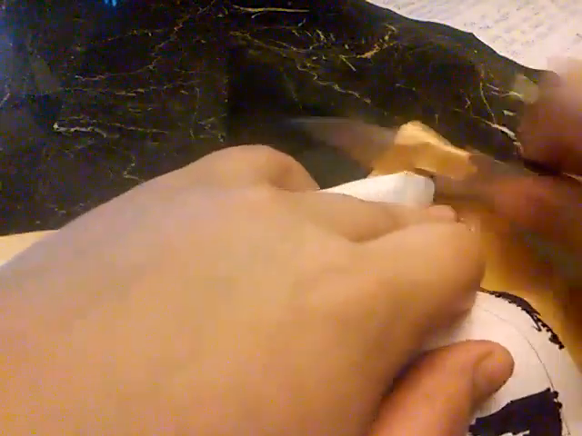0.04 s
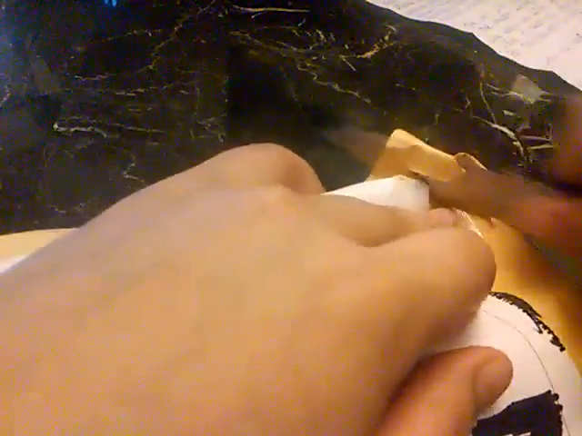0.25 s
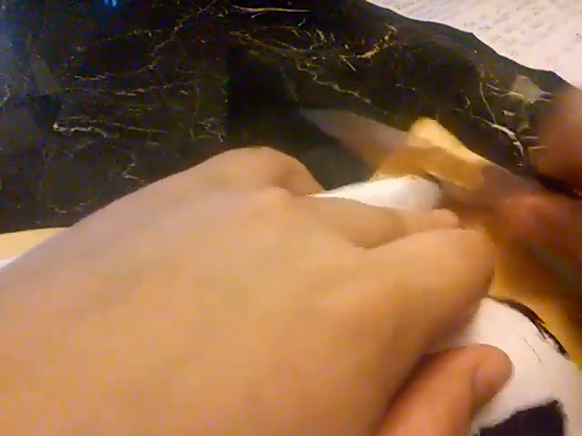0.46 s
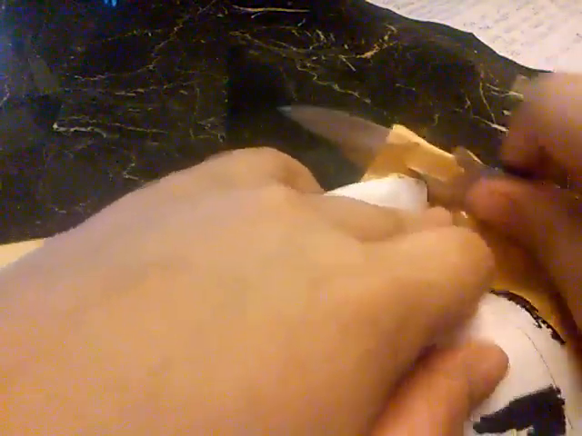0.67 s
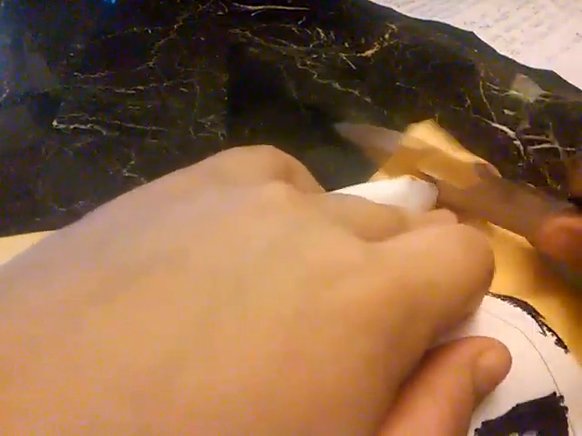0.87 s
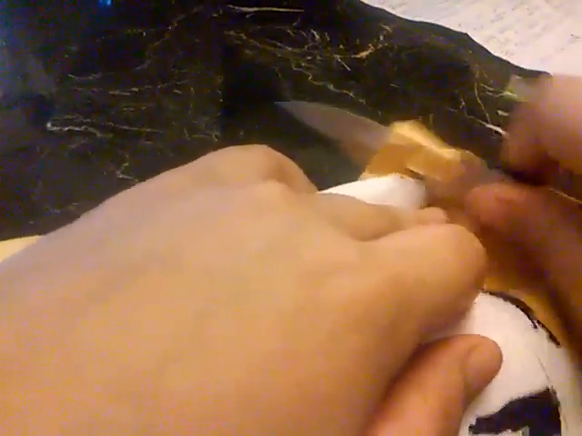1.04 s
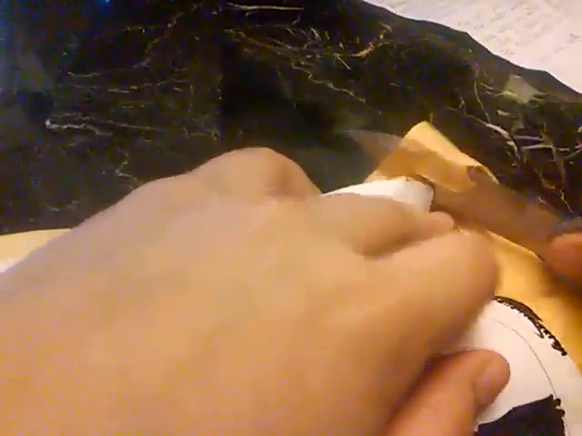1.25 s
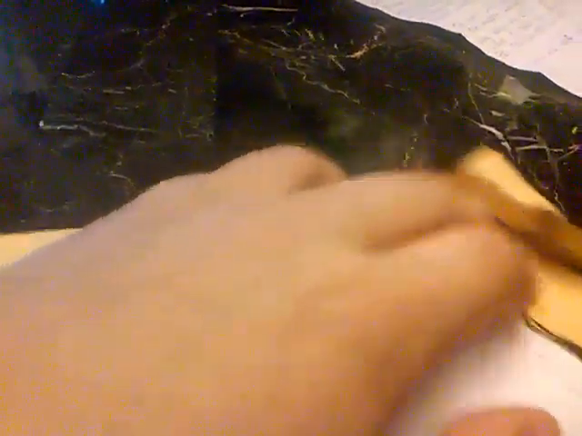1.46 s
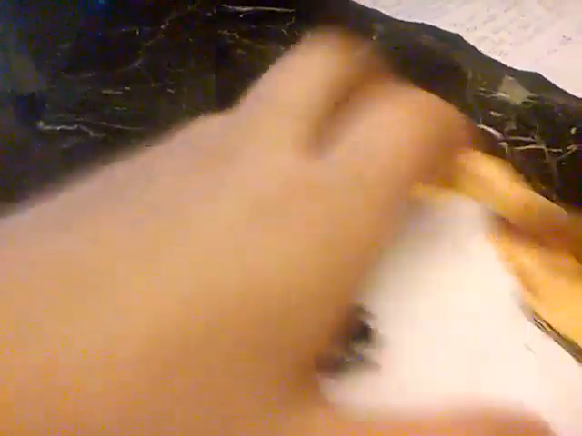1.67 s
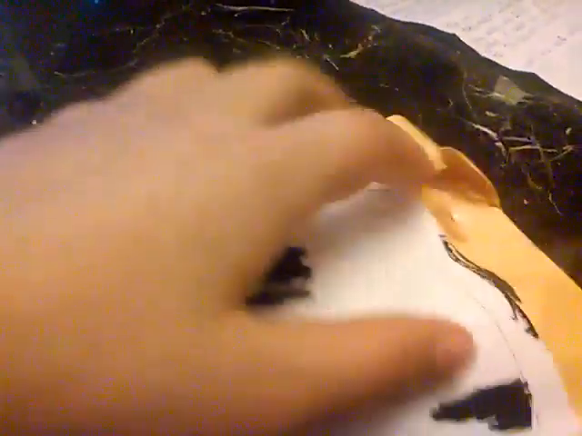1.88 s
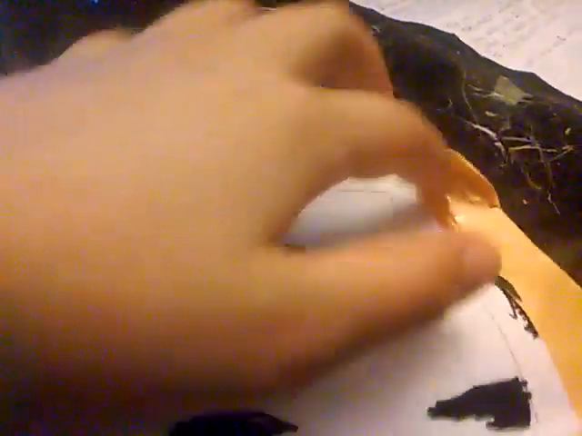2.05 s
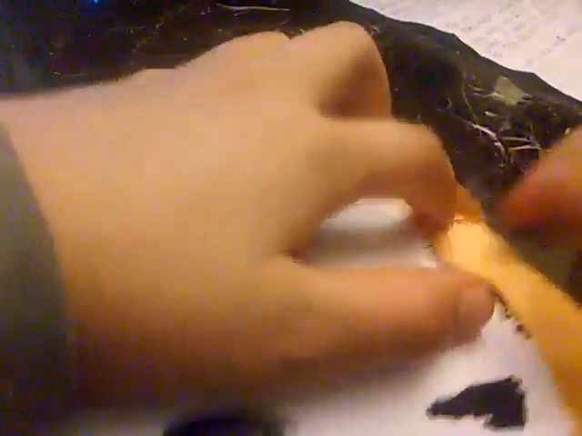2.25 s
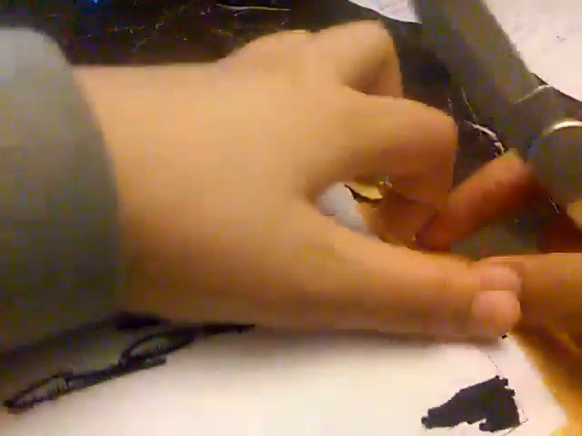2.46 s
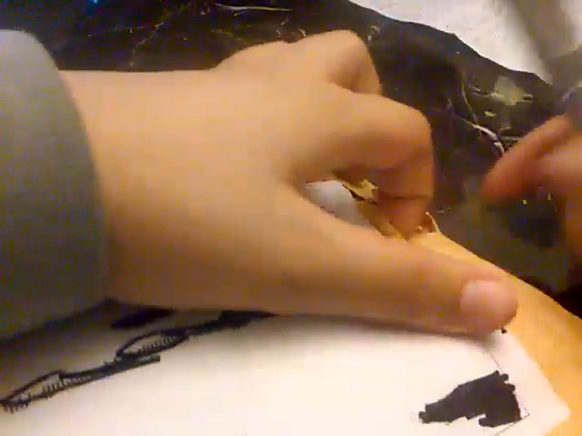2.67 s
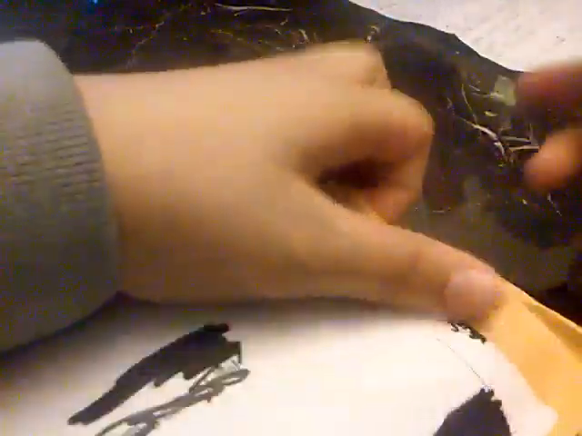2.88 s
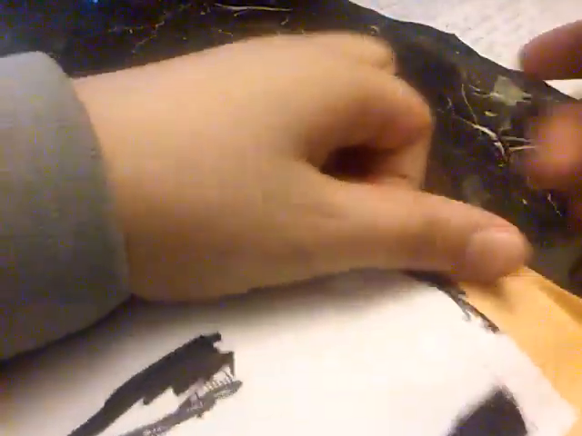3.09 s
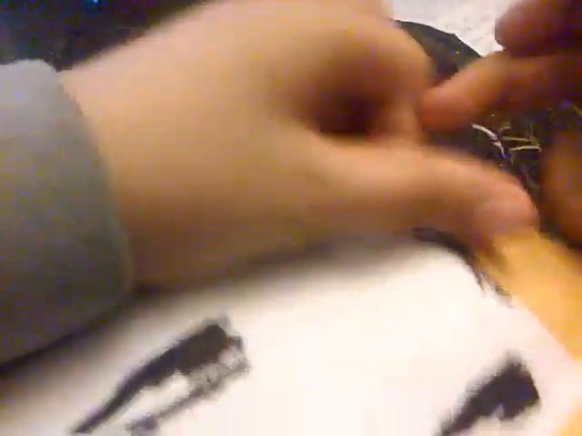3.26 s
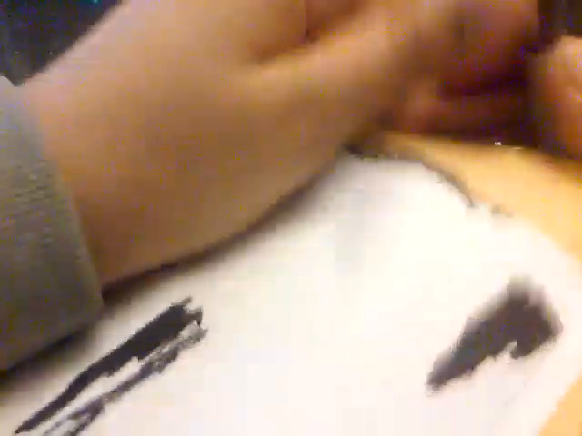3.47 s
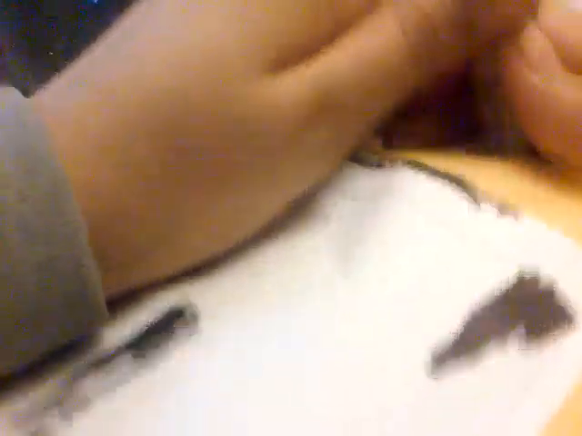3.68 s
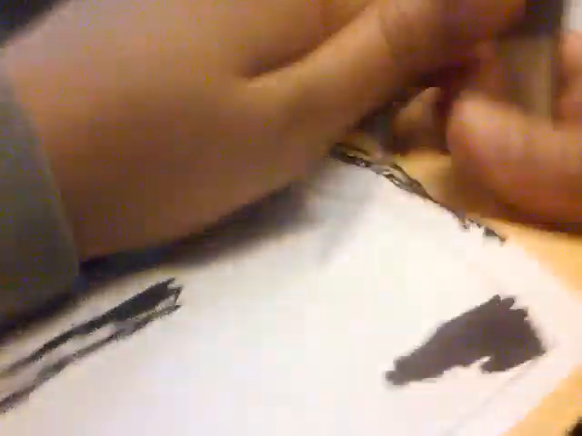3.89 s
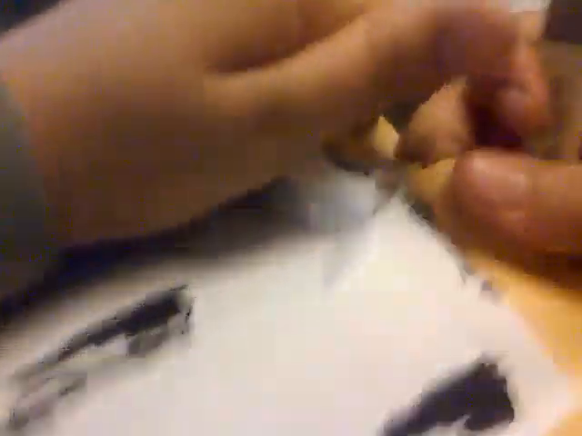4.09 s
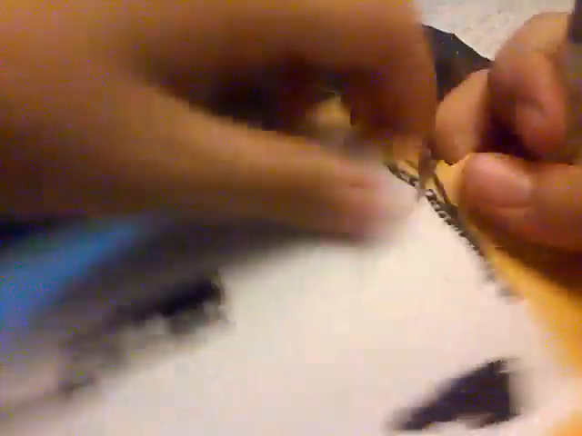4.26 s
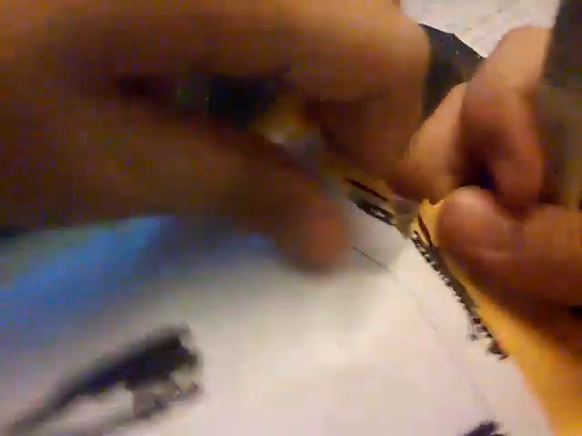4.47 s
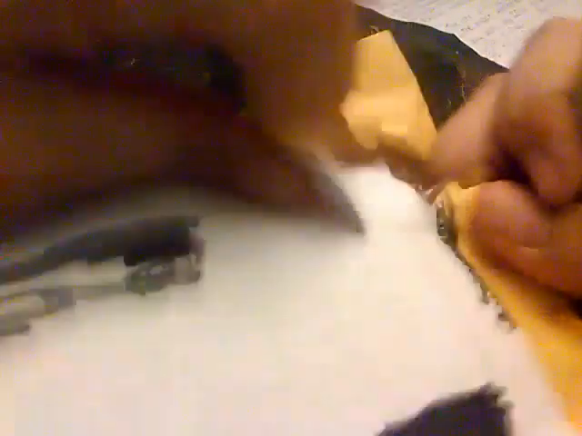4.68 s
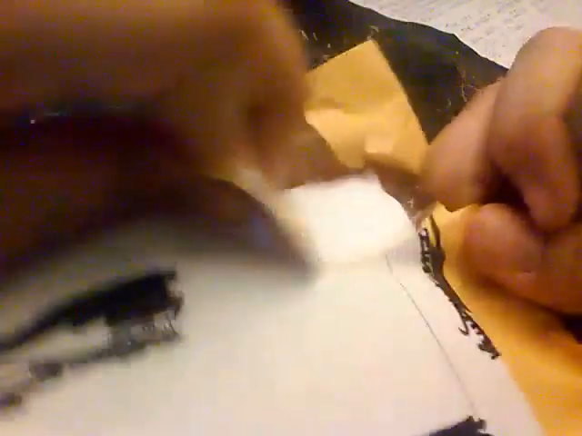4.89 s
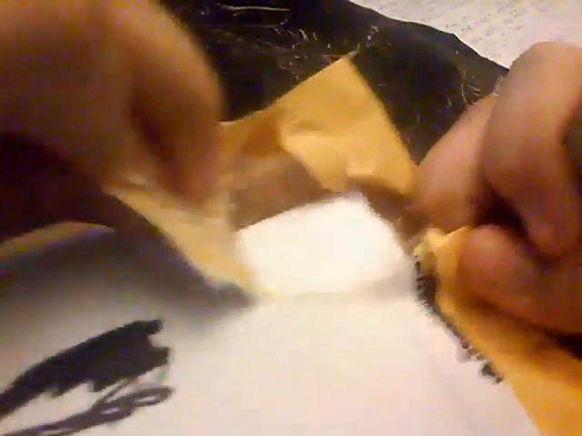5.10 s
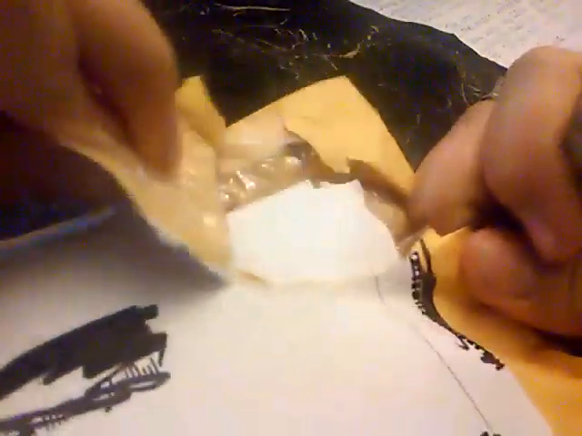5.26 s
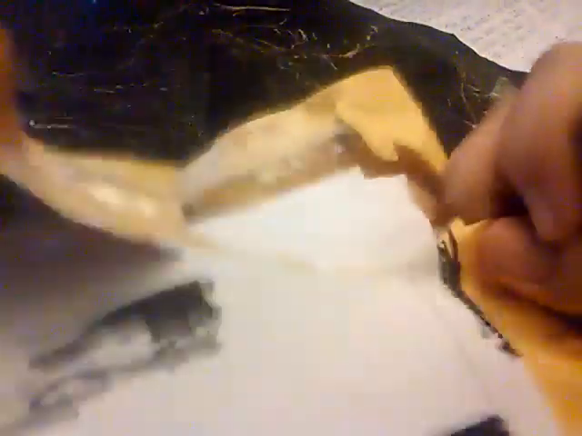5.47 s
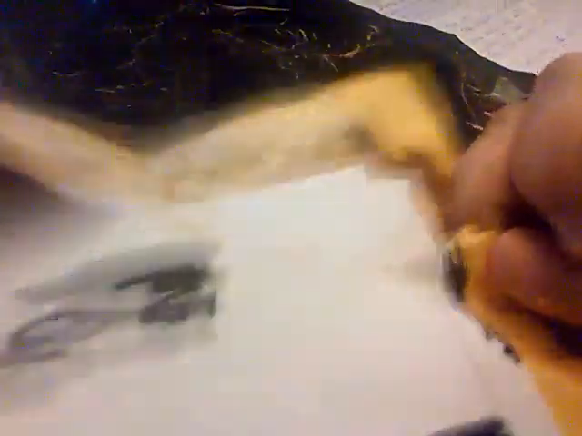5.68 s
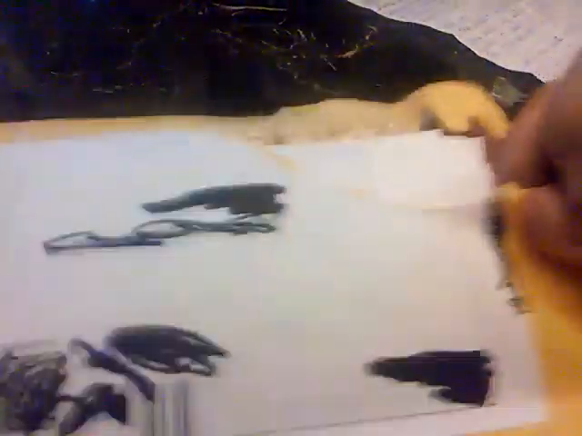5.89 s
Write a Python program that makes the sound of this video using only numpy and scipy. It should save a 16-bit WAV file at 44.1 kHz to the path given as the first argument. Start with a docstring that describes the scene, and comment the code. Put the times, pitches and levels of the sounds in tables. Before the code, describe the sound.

Eight or so short sawing strokes of a blade in paper come first, thin and papery with a slight metallic hiss. Next come hand rubs, isolated snaps and pauses, then a burst of crumpling and hollow bumps. Last, paper and plastic padding tear in stuttering, loud pulls. The recording is close and fairly dry, with short indoor reflections, a faint gated hush and softened peaks.

```python
"""A padded paper mailer is sawn at, rubbed and finally ripped open close by, in a small room.
Noise and random clicks make the rasp of blade, skin and tear; it also drums the sheet and shakes the padding.
Snaps, crinkles, hollow thumps, humming skids and a singing blade are ringing resonances.
Echoes and a faint hush lie behind; the recorder gates quiet sound and rounds off the loudest peaks."""
import sys
import numpy as np
from scipy import signal
from scipy.fft import rfft, irfft
from scipy.io import wavfile
from scipy.ndimage import uniform_filter1d

SR = 44100
rng = np.random.default_rng(int(sys.argv[2]) if len(sys.argv) > 2 else 0)


def dump_mix(stems):
    """Bounce the given channels to the path in sys.argv[1] as a 16-bit WAV at rate SR."""
    frames = np.atleast_2d(stems).T  # one column per channel
    limited = np.clip(frames, -1, 1)  # hard clip at full scale
    pcm = np.round(limited * 32767).astype(np.int16)
    wavfile.write(sys.argv[1], SR, pcm)


N = 261954
TIME = np.arange(N) / SR

# The knife goes to and fro. Each row: start in seconds, length in seconds, rasp of the fibres in dB,
# then drumming of the sheet and rumble of the padding, both in dB against the rasp (all before trims).
KNIFE_STROKES = [(-0.02, 0.11, -42, -1.5, -15), (.102, 0.2, -34, -8, -23), (.3, 0.19, -34.5, -6, -19.5),
                 (.519, .15, -35, -5.5, -26), (.683, 0.14, -36, -4.5, -21.5), (.824, 0.17, -35.5, -8, -26),
                 (.995, .15, -33, -3, -13), (1.14, 0.2, -36.5, -6.5, -15.5)]
STROKE_LEAN = 0.93   # under 1, the speed peaks before the middle of a stroke


def knife():
    """The edge saws through fine fibres and sets the flap ringing; a faster blade sounds brighter."""
    # Spectrum of the sawing. Each row: frequency in Hz, level in dB.
    saw_spectrum = [(35, -34), (60, -5), (193, -16.5), (346, -6.5), (492, -24.5), (991, 1), (1700, -4.5),
                    (2050, -15.5), (2300, -3.5), (2580, -7), (2900, -3.5), (4030, -8.5), (5330, -10),
                    (14200, -13), (16000, -18)]
    # The flap rings under the blade. Each row: frequency in Hz, width in Hz, boost in dB.
    flap_rings = [(1820, 160, 8.5), (2950, 380, 3), (5270, 760, 6), (7800, 310, 2.5)]
    # rasp, sheet and padding grow as these powers of the speed
    effort = slides(KNIFE_STROKES, (1.33, 1, 1), STROKE_LEAN)
    force = fibres(per_s=5900, spread_db=-2.0, friction_db=-3.0, patchy_db=1.0)
    ringing = sum((from_db(db) - 1) * resonance(force, hz, width) for hz, width, db in flap_rings)
    sawing = paper(effort, force + ringing, saw_spectrum, slips_per_s=270, slip_db=2.0,
                   rasp_db=-1.46, sheet_db=-2.7, pad_db=2.0)
    return sawing + crinkles(effort, ring_db=3.5, crack_db=-9.0)


def blade_song(sing_hz=5390, width_hz=870, sing_db=-7, speed_power=4.0):
    """Near the top speed of each stroke, friction excites a narrow band of the blade."""
    effort = slides(KNIFE_STROKES, [speed_power], STROKE_LEAN)[0]
    friction = rng.standard_normal(N)
    tone = resonance(resonance(friction, sing_hz, width_hz), sing_hz, width_hz)
    return from_db(sing_db) * effort * rms_one(tone)


def fingers():
    """Skin drags over paper, with sparse crinkles; it grips at once, so speed matters less."""
    # Finger slides. Each row: start in seconds, length in seconds, rasp in dB,
    # then drumming of the sheet and rumble of the padding, both in dB against the rasp (all before trims).
    finger_slides = [(1.35, 0.24, -48.5, 1, -1), (1.398, 0.34, -39, -4, -16), (1.597, 0.091, -32.5, 1, -15),
                     (1.705, 0.1, -31, -9.5, -17), (1.778, 0.091, -39.5, -2.5, -7),
                     (1.903, 0.092, -53, 3.5, -1), (2.087, 0.026, -48, -4.5, -2.5),
                     (2.2, 0.1, -48, -8, -0.5), (2.392, 0.19, -40.5, -13.5, -14),
                     (2.671, 0.042, -44.5, -4.5, -9), (2.793, 0.047, -48.5, 0, -5.5),
                     (2.812, 0.079, -43, -6.5, -17.5), (2.91, 0.2, -37.5, -6, -15),
                     (3.135, 0.073, -40, -3.5, -13.5), (3.243, 0.086, -46.5, -0.5, -15),
                     (3.338, 0.071, -49.5, -6, -16), (3.386, 0.14, -39.5, -3, -12.5),
                     (3.5, 0.13, -35.5, -6.5, -17.5), (3.673, 0.19, -42, -3, -15),
                     (3.75, 0.12, -31, -8.5, -14), (3.87, 0.072, -36, -8.5, -12),
                     (3.938, 0.13, -25, -3.5, -18.5), (4.04, 0.073, -48.5, -4, -2),
                     (4.145, 0.16, -50, -3, -17), (4.23, 0.18, -38, -4, -8), (4.375, 0.21, -39, -6.5, -17),
                     (4.524, 0.12, -45, -8, -16.5)]
    # Spectrum of the rubbing. Each row: frequency in Hz, level in dB.
    rub_spectrum = [(35, -24), (60, -11.5), (130, -8.5), (168, -14), (233, -10), (398, -13.5), (437, -29),
                    (903, 3.5), (1200, 8), (1550, -2.5), (5210, -6), (10500, -10.5), (16000, -17.5)]
    # Flat skin rubs dully, nails and film edges brightly. Each row: time in seconds, top treble in dB.
    treble_path = [(1.4, -2.5), (1.8, -4.5), (2.45, 3), (2.7, -3.5), (3.0, -5.5), (3.3, -5), (3.6, -1),
                   (3.95, -0.5), (4.2, -5), (4.5, 6)]
    effort = slides(finger_slides, (0.45, 0.35, 0.54), lean=0.67)
    force = fibres(per_s=2500, spread_db=0.5, friction_db=4.5, patchy_db=-0.5)
    dull = band(force, 7000, "low", order=1)
    treble_gain = from_db(np.interp(TIME, *np.transpose(treble_path)))
    force = dull + treble_gain * (force - dull)
    rubbing = paper(effort, force, rub_spectrum, slips_per_s=380, slip_db=4.0,
                    rasp_db=-1.84, sheet_db=-3.3, pad_db=0.0)
    return rubbing + crinkles(effort, ring_db=0.5, crack_db=-1.5)


def rip():
    """The tear runs in jerks through fibre bundles and plastic film."""
    # Spectrum of the tearing. Each row: frequency in Hz, level in dB.
    rip_spectrum = [(29, -45), (50, -18), (96, -6.5), (184, -7.5), (246, -5), (678, -12), (1330, -0.5),
                    (1500, -3), (1820, -9), (2440, -6.5), (4790, -3.5), (10400, -8.5), (16000, -15.5)]
    effort = pulls()
    force = fibres(per_s=3200, spread_db=3.0, friction_db=-2.5, patchy_db=2.0)
    tearing = paper(effort, force, rip_spectrum, slips_per_s=200, slip_db=2.5,
                    rasp_db=1.2, sheet_db=-1.0, pad_db=-3.5)
    return tearing + crinkles(effort, ring_db=-2.0, crack_db=5.5)


def pulls(build_db=25, fall_db_per_s=474):
    """In each jerk the tension builds, holds while the tear runs, and dies away."""
    # The tear jerks on. Each row: start in seconds, rise in seconds, hold in seconds, rasp in dB,
    # then drumming of the sheet and rumble of the padding, both in dB against the rasp (all before trims).
    tear_jerks = [(4.703, 0.018, 0.067, -29.5, -4.5, -4.5), (4.901, 0.011, 0.024, -42.5, 0, -2.5),
                  (4.929, 0.043, 0.13, -27.5, -7.5, -14.5), (5.117, 0.064, 0.063, -35.5, -9.5, -10),
                  (5.246, 0.028, 0.034, -26.5, -8, -10.5), (5.318, 0.029, 0.063, -30, -4.5, -13),
                  (5.402, 0.031, 0.02, -17, -9, -10.5), (5.443, 0.029, 0.019, -14.5, -2.5, -3),
                  (5.517, 0.012, 0.083, -44, 3, -4.5), (5.603, 0.044, 0.049, -38.5, -2, -7.5),
                  (5.725, 0.059, 0.059, -17, -0.5, -4), (5.804, 0.026, 0.037, -15.5, -1, -6)]
    t = TIME[:SR // 2]

    def tension(rise, hold):
        """Gain that climbs, stays at 1, then falls steadily in dB."""
        climb = build_db * np.minimum(t / rise - 1, 0)
        fall = fall_db_per_s * np.maximum(t - rise - hold, 0)
        return from_db(climb - fall)
    return effort_of((start, tension(rise, hold), *levels) for start, rise, hold, *levels in tear_jerks)


def slides(rows, powers, lean):
    """Each slide speeds up and slows down in a leaning half sine; its loudness follows the speed."""
    def loudness(start, length):
        """A power of the speed for each layer."""
        share = (np.arange(max(start, 0), start + length, 1 / SR) - start) / length
        speed = np.sin(np.pi * share ** lean).clip(0)
        return speed ** np.array(powers)[:, None]
    return effort_of((start, loudness(start, length), *levels) for start, length, *levels in rows)


def effort_of(moves):
    """Turn moves into gains of rasp, sheet and padding; overlapping moves add in power."""
    power = np.zeros((3, N))
    for start, envelope, rasp_db, sheet_db, pad_db in moves:
        gains = from_db([[rasp_db], [rasp_db + sheet_db], [rasp_db + pad_db]]) * envelope
        for layer, gain in zip(power, gains):
            add(layer, start, gain ** 2)
    return np.sqrt(power)


def fibres(per_s, spread_db, friction_db, patchy_db):
    """Fibres let go at random with uneven force, each ringing a small facet, over smooth sliding friction."""
    sizes = from_db(spread_db * np.minimum(rng.exponential(1, N), 4.5)) * rng.choice([-1, 1], N)
    clicks = sizes * (rng.random(N) < per_s / SR)
    pitches = np.geomspace(700, 15000, 16)   # Hz
    dealt = rng.integers(0, len(pitches), N)
    breaks = np.zeros(N)
    for k, hz in enumerate(pitches):
        # the facets in play change as the contact travels
        patches = from_db(patchy_db * drift(25))
        breaks += resonance(clicks * (dealt == k), hz, hz / 2) * patches
    return rms_one(rms_one(breaks) + from_db(friction_db) * rng.standard_normal(N))


def paper(effort, force, colour, slips_per_s, slip_db, rasp_db, sheet_db, pad_db):
    """A sticking and slipping force rasps at the contact, drums the sheet and shakes the padding."""
    grip = from_db(slip_db * np.clip(drift(slips_per_s), -2, 2))
    sound = coloured(force * grip, colour)
    rasp = from_db(rasp_db) * evened(band(sound, 2890, "high", order=3))
    drum = from_db(sheet_db) * evened(band(sound, [620, 2400], "band", order=4))
    rumble = from_db(pad_db) * evened(band(sound, 550, "low", order=4))
    return np.sum(effort * [rasp, drum, rumble], axis=0)


def crinkles(effort, ring_db, crack_db, per_s=24, middle_hz=2200, pitch_octaves=0.55, spread_db=3.5):
    """Lesser creases give way at random, as small snaps whose levels follow the rasp of the moment."""
    out, rasp = np.zeros(N), effort[0]
    for s in rng.uniform(0, N / SR, int(per_s * N / SR)):
        ring, pitch, crack = np.clip(rng.standard_normal(3), -2, 2)
        hz = middle_hz * 2 ** (pitch_octaves * pitch)
        add(out, s, snap(ring_db + spread_db * ring, hz, crack_db + spread_db * crack))
    return rasp * out


def snaps():
    """The big creases and bonds give way."""
    # Paper buckles or a bond breaks. Each row: time in seconds, ring in dB, ring pitch in Hz,
    # crack in dB (both levels before trims).
    big_snaps = [(0.1181, -26, 2090, -24), (0.803, -35, 1380, -54), (1.0294, -21, 2730, -17),
                 (1.2058, -26.5, 1200, -27.5), (1.4929, -41, 2190, -30), (1.584, -15, 920, -23),
                 (1.601, -28, 1130, -52), (1.6161, -18.5, 1480, -37), (1.6732, -33.5, 1860, -46),
                 (2.143, -53, 3800, -53.5), (2.2122, -24.5, 2220, -53.5), (2.2759, -39.5, 2900, -38),
                 (2.554, -28.5, 1080, -61), (2.7933, -44.5, 2570, -64.5), (2.9045, -38, 2540, -33),
                 (2.982, -9, 2020, -11.5), (3.082, -25.5, 1960, -49), (3.1128, -33.5, 1000, -70),
                 (3.2486, -36.5, 1310, -65), (3.4747, -27.5, 1320, -29.5), (3.4997, -31, 1000, -47),
                 (3.5761, -33.5, 2290, -28.5), (3.6756, -35.5, 990, -44), (3.7496, -21.5, 1290, -19.5),
                 (3.7927, -18.5, 2430, -12), (3.8327, -23, 750, -21.5), (3.861, -25, 1270, -27.5),
                 (3.9401, -11, 1090, -17.5), (3.9451, -14.5, 2210, -2.5), (3.9711, -15.5, 3200, -35),
                 (4.0036, -26, 2080, -17.5), (4.0254, -18, 1630, -15.5), (4.1403, -20, 2670, -63),
                 (4.2303, -26.5, 1420, -32), (4.245, -30, 3350, -37), (4.282, -24.5, 2090, -29.5),
                 (4.3112, -21, 1290, -26.5), (4.365, -30.5, 1800, -30), (4.5318, -29.5, 2470, -23.5),
                 (4.5482, -25.5, 2460, -32), (4.6923, -39.5, 3400, -48), (4.7148, -18, 3060, -20),
                 (4.7202, -27.5, 2800, -24), (4.7477, -19.5, 2850, -22), (4.7523, -12.5, 2950, -17),
                 (4.9743, -22, 2170, -32), (5.2694, -30, 3000, -22), (5.2966, -18, 1590, -17),
                 (5.3493, -12, 2860, -15), (5.3832, -20, 3100, -17), (5.4319, -13, 2460, -18),
                 (5.4454, -0.5, 3300, -20), (5.4508, -11, 2670, -8), (5.4657, -5.5, 3200, -5),
                 (5.4956, -7.5, 3200, -6), (5.7306, -27, 2320, -25.5), (5.7668, -13.5, 1830, -10.5),
                 (5.7885, -22, 2800, -10), (5.7936, -1.5, 2710, 1.5), (5.8241, -8.5, 2600, -16),
                 (5.864, -17, 2220, -6)]
    out = np.zeros(N)
    for s, level, hz, crack_level in big_snaps:
        add(out, s, snap(level, hz, crack_level))
    return out


def snap(level, hz, crack_level, ring_t60=0.011, crack_t60=0.005, width_share=1.0, splinter=0.21,
         overtone=1.46, crack_middle_hz=6900, crack_attack_s=0.00017, crack_share=0.57,
         crack_spread=0.044, ring_db=-1.5, crack_db=-4.0):
    """A facet flips over: a burst of cracking, and two damped modes whose pitch follows the facet's size."""
    # Spectrum of a crack. Each row: frequency in Hz, level in dB.
    crack_spectrum = [(2000, -18), (3500, 0), (5400, 1.5), (8500, -5), (11000, -2.5), (16000, -9)]
    t = TIME[:1024]
    push, split = rng.standard_normal((2, len(t)))
    # one sharp release, then the crease splinters on
    push = (t == 0) + splinter * push * from_db(-60 * t / ring_t60)
    low, high = hz / np.sqrt(overtone), hz * np.sqrt(overtone)
    ring = resonance(push, low, width_share * low) - resonance(push, high, width_share * low)
    ring = band(ring, [650, 4800], "band", order=3)
    split = split * (1 - np.exp(-t / crack_attack_s)) * from_db(-60 * t / crack_t60)
    crack_hz = crack_middle_hz * np.exp(crack_spread * rng.standard_normal())
    crack = resonance(coloured(split, crack_spectrum), crack_hz, crack_share * crack_hz)
    both = from_db(level + ring_db) * rms_one(ring) + from_db(crack_level + crack_db) * rms_one(crack)
    # a level counts as if all the energy fell within four milliseconds
    return both * np.sqrt(0.004 * SR / len(t))


def skids(gain_db=-4.0, grain_db=2.5):
    """Friction held on one resonance starts quickly and eases off."""
    # An edge skids and keeps one patch of paper humming. Each row: start in seconds, length in seconds,
    # pitch in Hz, width in Hz, level in dB (before the gain).
    edge_skids = [(1.062, 0.041, 1300, 610, -28.5), (1.23, 0.16, 2950, 500, -47),
                  (1.26, 0.57, 1570, 250, -47.5), (1.397, 0.047, 7700, 1000, -49),
                  (1.609, 0.028, 3760, 2500, -23.5), (1.953, 0.025, 1400, 700, -42),
                  (2.548, 0.015, 1640, 1200, -38.5), (3.387, 0.041, 9100, 3050, -35),
                  (4.541, 0.032, 1600, 704, -32.5)]
    out = np.zeros(N)
    friction = rng.standard_normal(N) * from_db(grain_db * drift(400))
    for s, length, hz, width, level in edge_skids:
        corners = [s, s + 0.003, s + 0.7 * length, s + 1.2 * length]
        pressure = np.interp(TIME, corners, [0, 1, 1, 0])
        tone = rms_one(resonance(resonance(friction, hz, width), hz, width))
        out += from_db(level + gain_db) * pressure * tone
    return out


def thumps(t60=0.029, width_share=0.35, rattle=0.094, gain_db=-9.0, sag_hz=118, sag_db=-18.5):
    """The cushion gives a short hollow knock, sags with a deeper one and settles with a rattle."""
    # The air-filled padding is bumped or jerked. Each row: time in seconds, level in dB (before the gain),
    # pitch in Hz.
    padding_bumps = [(0.179, -43.5, 293), (0.907, -46.5, 330), (1.027, -41.5, 276), (1.583, -25.5, 266),
                     (1.586, -30.5, 520), (1.672, -40.5, 227.5), (2.207, -45, 426), (2.552, -39.5, 478),
                     (3.01, -37.5, 188), (3.83, -28.5, 492), (4.023, -21.5, 312), (4.231, -34.5, 173),
                     (4.338, -35, 101), (4.722, -34, 460), (4.743, -28, 200), (4.766, -33.5, 191),
                     (5.365, -29.5, 444), (5.48, -19.5, 362), (5.64, -34.5, 332), (5.801, -14.5, 322)]
    out, t = np.zeros(N), TIME[:4096]
    for s, level, hz in padding_bumps:
        push = (t == 0) + rattle * rng.standard_normal(len(t)) * from_db(-60 * t / t60)
        knock = band(resonance(push, hz, width_share * hz), 600, "low")
        sag = band(resonance(push, sag_hz, width_share * sag_hz), 400, "low")
        add(out, s, from_db(level + gain_db) * (rms_one(knock) - from_db(sag_db) * rms_one(sag)))
    return out


def hand_echo(x, lag_s=0.000498, sway=0.34, echo_db=-15.0):
    """The moving hand reflects the treble a little late, so ripples wander through the spectrum."""
    lag = lag_s * np.exp(sway * drift(9))
    late = np.interp(TIME - lag, TIME, x)
    echo = from_db(echo_db) * band(late, 1000, "high", order=1)
    return (x + echo) / np.hypot(1, from_db(echo_db))


def room(x, first_echo_s=0.0068, t60=0.22):
    """Scattered echoes from walls and furniture."""
    # Spectrum of the echoes. Each row: frequency in Hz, level in dB against the direct sound.
    echo_spectrum = [(100, -10.5), (400, -15.5), (1400, -10.5), (2600, -10.5), (5000, -15), (16000, -14)]
    t = TIME[:SR // 2]
    echoes = rng.standard_normal(len(t)) * from_db(-60 * t / t60) * (t > first_echo_s)
    return signal.fftconvolve(x, coloured(rms_one(echoes) / np.sqrt(len(t)), echo_spectrum))[:N]


def hush(level_db=-61.5):
    """The still room is steady noise, strongest in the bass."""
    # Spectrum of the still room. Each row: frequency in Hz, level in dB.
    hush_spectrum = [(30, 7), (100, -6), (300, -11), (1000, -20.5), (4000, -21.5), (16000, -24.5)]
    return from_db(level_db) * rms_one(coloured(rng.standard_normal(N), hush_spectrum))


def from_db(db):
    """Decibels to gain."""
    return 10 ** (np.asarray(db) / 20)


def rms_one(x):
    """Scale to an average level (rms) of 1."""
    return x / np.sqrt(np.mean(x ** 2) + 1e-20)


def evened(x, size=1100):
    """Hold the level steady over a few hundredths of a second; the fine grain stays."""
    power = uniform_filter1d(uniform_filter1d(x ** 2, size), size)
    return x / np.sqrt(power + 1e-12)


def band(x, hz, kind, order=2):
    """Keep the low, high or middle part of a sound with a Butterworth filter."""
    edges = np.clip(hz, 10, 0.45 * SR)
    return signal.sosfilt(signal.butter(order, edges, kind, fs=SR, output="sos"), x + 1e-18)


def coloured(x, points):
    """Shape a sound by a spectrum of a few points."""
    hz, db = np.transpose(points)
    bins = np.maximum(np.fft.rfftfreq(len(x), 1 / SR), 1)
    gain = from_db(np.interp(np.log(bins), np.log(hz), db))
    return irfft(rfft(x) * gain, len(x))


def resonance(x, hz, width_hz):
    """Ring at one pitch, with gain 1 at the peak; a narrower width rings longer."""
    r = np.exp(-np.pi * width_hz / SR)
    feed = np.array([1, 0, -1]) * (1 - r * r) / 2
    return signal.lfilter(feed, [1, -2 * r * np.cos(2 * np.pi * hz / SR), r * r], x + 1e-18)


def drift(rate):
    """Smooth chance of rms 1, with the given number of new values per second."""
    return rms_one(np.interp(TIME * rate, np.arange(N), rng.standard_normal(N)))


def add(out, s, sound):
    """Mix a short sound in at a time in seconds."""
    start = max(round(s * SR), 0)
    out[start:start + len(sound)] += sound[:N - start]


def scene():
    """The mailer, its room and the quiet behind it."""
    paper_work = knife() + blade_song() + fingers() + rip() + snaps()
    mailer = hand_echo(paper_work) + skids() + thumps()
    return (mailer + room(mailer) + hush())[None]


def gate(x, threshold_db=-48.0, depth_db=16.5):
    """Quiet sound falls a further decibel for each one below the threshold, down to a limit."""
    power = uniform_filter1d(x ** 2, size=400)
    level = 10 * np.log10(np.maximum(power, 1e-14))
    return x * from_db(np.clip(level - threshold_db, -depth_db, 0))


def record(dry, top=0.83, cutoff_hz=16000):
    """Sound near 4 kHz trails each click; quiet sound is gated, peaks are rounded and the top is cut."""
    x = dry
    for width_hz in (130, 260):
        # taking away twice a resonance turns its phase, which delays sound near its pitch
        x = x - 2 * resonance(x, 4000, width_hz)
    x = top * np.tanh(gate(x) / top)
    return signal.sosfilt(signal.ellip(12, 0.1, 80, cutoff_hz, fs=SR, output="sos"), x)


dry = scene()
out = record(dry)
dump_mix(out)
```